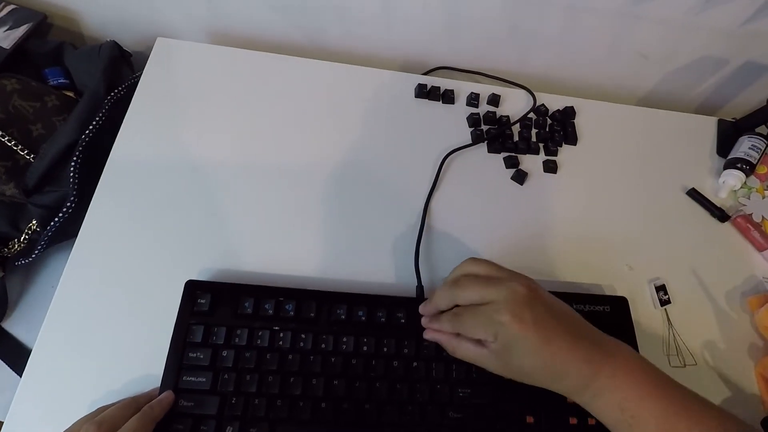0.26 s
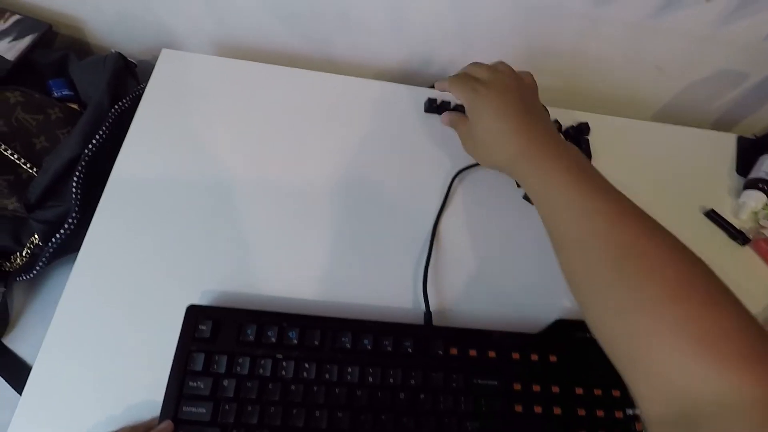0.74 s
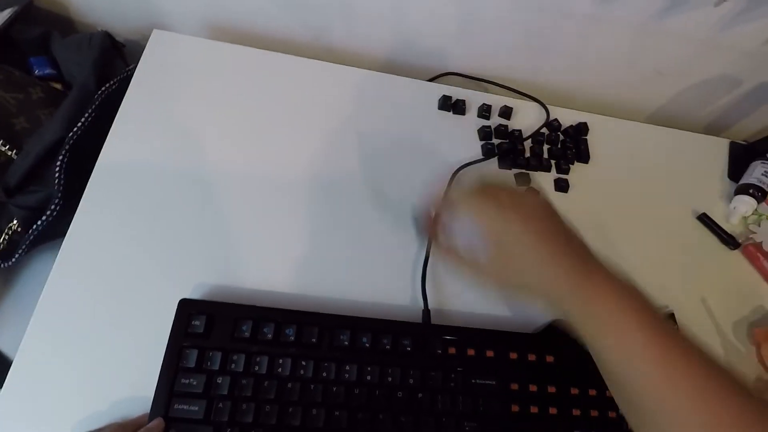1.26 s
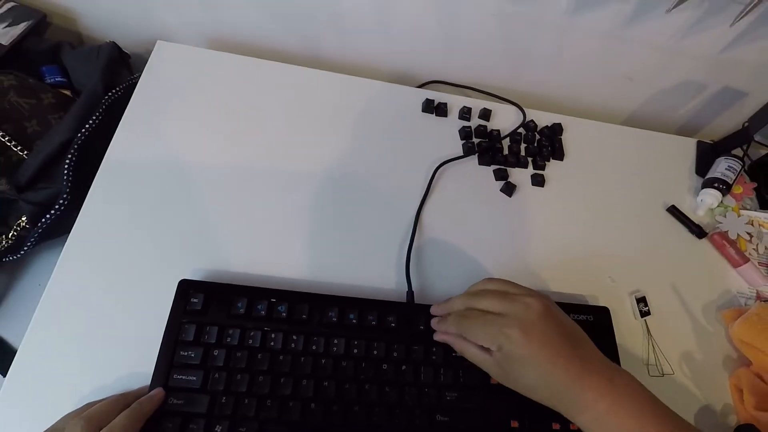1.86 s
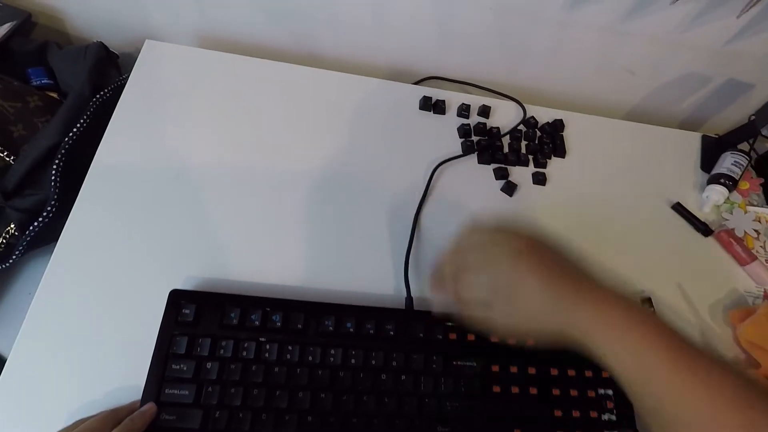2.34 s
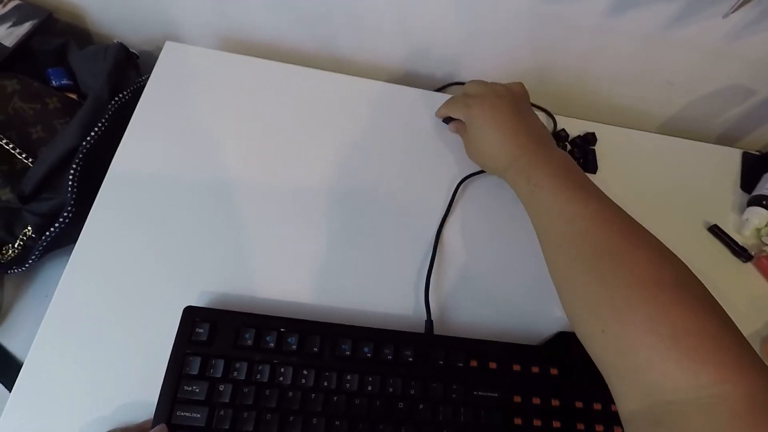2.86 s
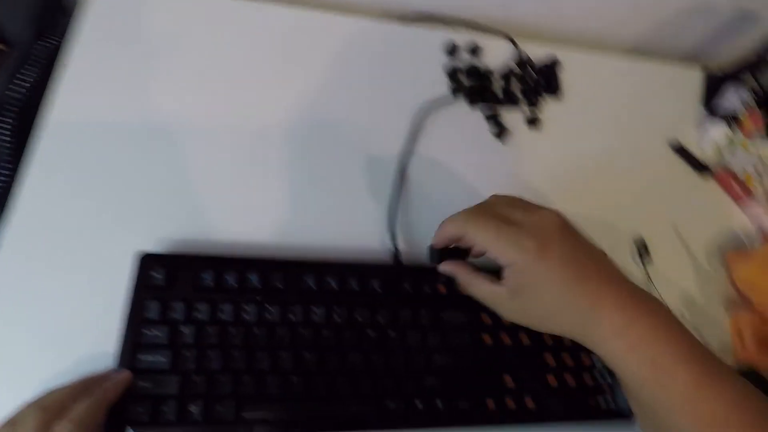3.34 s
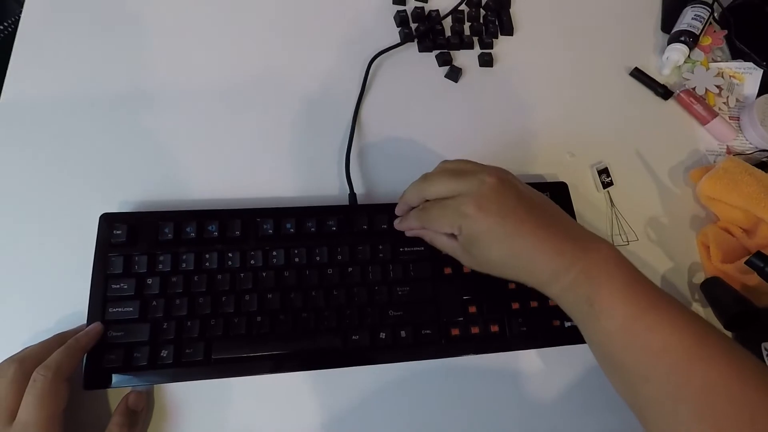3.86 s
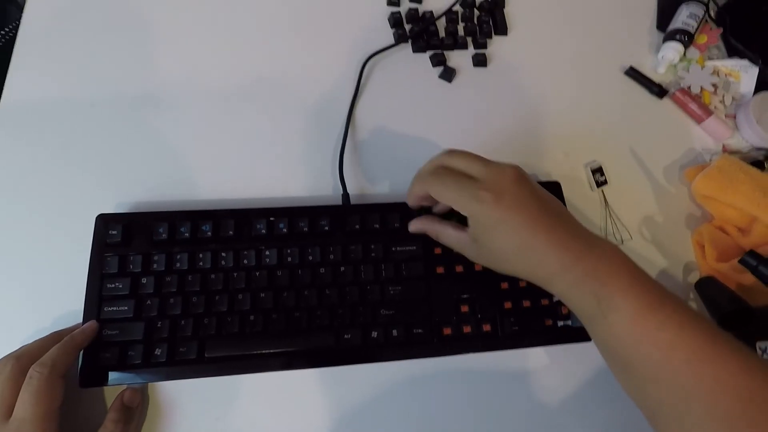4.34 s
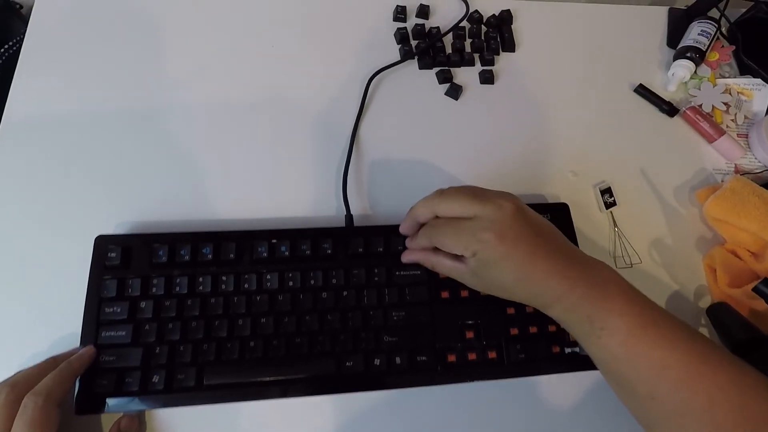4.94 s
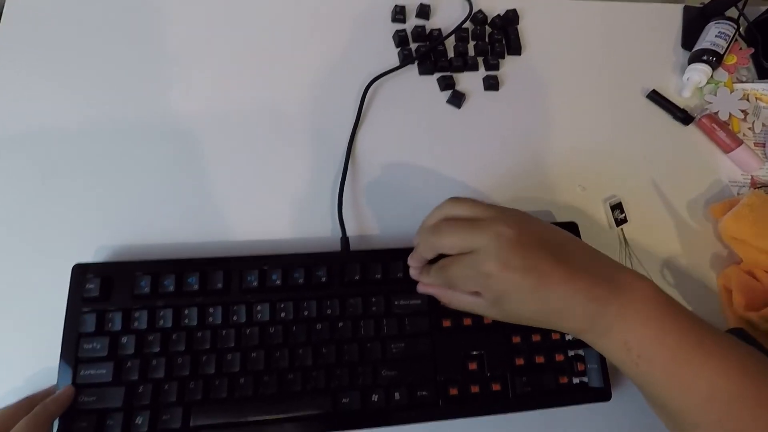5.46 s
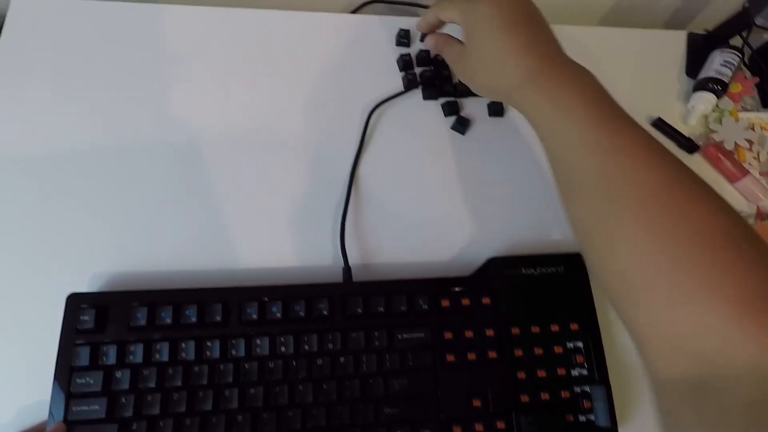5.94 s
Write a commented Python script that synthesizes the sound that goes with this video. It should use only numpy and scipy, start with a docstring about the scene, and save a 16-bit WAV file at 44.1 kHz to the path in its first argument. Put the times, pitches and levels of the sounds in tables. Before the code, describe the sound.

Irregular small plastic clacks, scrapes and ticks as keycaps snap onto a keyboard on a desk, with steady low hum and faint hiss in a small room.

```python
"""Plastic keycaps picked off a desk and pushed onto keyboard switches, in a small furnished room.
Throughout, two fan motors of nearly equal speed hum and beat over soft air noise and microphone hiss.
A flurry of contacts comes first, then sparser ones up to the hardest snap at 1.94 s; more handling leads
to a second hard snap at 3.84 s, then busy contacts until about 5.6 s and a last touch at 6.1 s.
Contacts are short chatters ringing cap, case and desk top; rubbing caps ring through stick-slip ticks."""
import sys
import numpy as np
from scipy import signal
from scipy.fft import rfft, irfft, next_fast_len
from scipy.io import wavfile
from scipy.ndimage import uniform_filter1d

SR = 44100
rng = np.random.default_rng(int(sys.argv[2]) if len(sys.argv) > 2 else 0)


def digitize_waveform(pressure):
    """Quantize a signal to 16-bit integers and store it at the path in sys.argv[1].

    Rows of a 2-D input are taken as channels; values are limited to [-1, 1].
    """
    field = np.atleast_2d(pressure).T
    bounded = np.clip(field, -1, 1)
    quanta = np.round(bounded * 32767).astype(np.int16)
    wavfile.write(sys.argv[1], SR, quanta)


N = 272979  # length in samples


def undb(db):
    """Decibels to gain."""
    return 10 ** (np.asarray(db) / 20)


def walk(rate_hz):
    """Slow random drift: a new level every 1 / rate_hz seconds, slewed twice; spread near 0.6."""
    hold = int(SR / rate_hz)
    steps = np.repeat(rng.standard_normal(N // hold + 1), hold)
    slewed = uniform_filter1d(uniform_filter1d(steps, hold), hold)
    return 0.8 * slewed[:N]


def shaped_noise(size, hz, db):
    """Noise whose spectrum follows the points on a log-frequency axis."""
    f = np.arange(1, size // 2 + 2) * SR / size
    gain = undb(np.interp(np.log(f), np.log(hz), db))
    return irfft(rfft(rng.standard_normal(size)) * gain, size)


# Spectrum of the air noise and hiss. Each row: frequency in Hz, relative density in dB.
AIR_SPECTRUM = [(18, -29), (34, -1.5), (60, -13), (110, -20), (200, -32), (330, -28), (540, -37),
                (990, -42), (1400, -47.5), (1750, -49.5), (1960, -44), (2200, -53), (6000, -57),
                (14500, -58.5), (16000, -73.5)]
AIR_DB = -47  # rms level around which the noise drifts


def air():
    """Steady air noise and microphone hiss behind everything, swelling a little."""
    noise = shaped_noise(next_fast_len(N), *np.transpose(AIR_SPECTRUM))[:N]
    return undb(AIR_DB + 1.2 * walk(0.9)) * noise / np.std(noise)


# Hum of the fans. Each row: multiple of the first motor, multiple of the second, middle peak level in dB.
HUM_LINES = [(1, 0, -33.5), (0, 1, -38.5), (2, 0, -60.5), (1, 1, -72), (2, 1, -61.5), (3, 1, -65.5)]
# Mains buzz. Each row: frequency in Hz, middle peak level in dB.
MAINS_LINES = [(120, -68.5), (180, -70), (240, -80), (300, -64.5), (360, -70.5), (420, -69.5)]
FIRST_MOTOR_HZ, SECOND_MOTOR_HZ = 57.94, 56.18
BEAT_TOP_S = 0.22  # all lines crest together here


def hum():
    """The motors beat against each other with harmonics and sum tones; the mains buzzes faintly."""
    t = np.arange(N) / SR - BEAT_TOP_S
    out = np.zeros(N)
    for first, second, db in HUM_LINES:
        hz = first * FIRST_MOTOR_HZ + second * SECOND_MOTOR_HZ
        out += undb(db + 0.35 * walk(18)) * np.cos(2 * np.pi * hz * t)
    for hz, db in MAINS_LINES:
        out += undb(db + 2.5 * walk(11)) * np.cos(2 * np.pi * hz * t)
    return out


# Slow part of the room's echo. Each row: frequency in Hz, level over the dry sound in dB, t60 in s.
ROOM_ECHO = [(152, -13.5, 0.63), (410, -9.5, .5), (978, -12.5, 0.34), (2600, -11.5, 0.38),
             (3700, -11.5, .42), (4940, -15, 0.46), (8760, -14.5, .4), (14700, -14.5, 0.21)]
EARLY_DB, EARLY_T60_S = 1.5, 0.022  # fast part: level over the slow part, decay time
SMEAR, SMEAR_HZ = 0.045, 122.4  # the echo blurs the spectrum by this share of the pitch, at least this much


def room(dry):
    """Diffuse echo: the energy of the near sound returns as noise that fades fast, then slowly."""
    frames = dict(nperseg=256, noverlap=192)
    f, t, spectrum = signal.stft(dry, SR, **frames)
    blur = np.exp(-.5 * ((f[:, None] - f) / np.maximum(SMEAR * f, SMEAR_HZ)) ** 2)
    power = (blur / np.sum(blur, axis=0)) @ np.abs(spectrum) ** 2

    hz, db_points, t60_points = np.transpose(ROOM_ECHO)
    db = np.interp(np.log(f + 1), np.log(hz), db_points)[:, None]
    t60 = np.interp(np.log(f + 1), np.log(hz), t60_points)[:, None]
    lag = t[None, :600] - .006  # the first walls answer after a few ms

    def fade(t60_s):
        """Exponential energy decay, about unit energy in all."""
        rate = np.log(1e6) / t60_s
        return (lag > 0) * np.exp(-rate * lag) * rate * t[1]

    response = undb(2 * db) * (fade(t60) + undb(2 * EARLY_DB) * fade(EARLY_T60_S))
    echo_power = np.abs(signal.fftconvolve(power, response, axes=1)[:, :len(t)])
    noise = signal.stft(rng.standard_normal(N), SR, **frames)[2]
    return signal.istft(np.sqrt(echo_power) * noise / np.std(noise), SR, **frames)[1][:N]


def ring(modes, length_s, detune=0.022, scatter_db=3.5):
    """Impulse response of each mode, one row a mode, scattered by chance; neighbours swing oppositely."""
    hz, db, t60 = np.transpose(modes)[:, :, None]
    level_chance, pitch_chance = rng.standard_normal((len(modes), 2)).T[:, :, None]
    t = np.arange(int(length_s * SR)) / SR
    decay = np.exp(-np.log(1000) * t / np.maximum(t60, .003))
    sense = (-1) ** np.arange(len(modes))[:, None]
    swing = np.sin(2 * np.pi * hz * (1 + detune * pitch_chance) * t)
    return sense * undb(db + scatter_db * level_chance) * decay * swing


def focus(modes, centre_hz, db_per_octave=7.5):
    """The place of contact favours the modes near centre_hz."""
    octaves = np.abs(np.log2(np.transpose(modes)[0][:, None] / centre_hz))
    return undb(-db_per_octave * octaves)


# Ringing modes of the plastic cap, its edge (the top treble) and the keyboard case.
# Each row: middle frequency in Hz, middle relative level in dB, t60 in s.
CAP_MODES = [(3396, 1, 0.0037), (3820, -6, .005), (4296, -5.5, .008), (5200, -5, 0.0072),
             (5970, -8.5, 0.0054), (5780, -8, 0.011), (6670, -6, 0.0042), (8060, -12.5, 0.018),
             (7150, -8.5, 0.0067), (8680, -6, 0.012), (8900, -10, .006)]
EDGE_MODES = [(9780, 0, 0.0073), (11300, -5.5, .005), (11880, -4, 0.0075), (12800, -6.5, .005),
              (14500, -4, 0.0046), (14950, -4.5, 0.0034)]
CASE_MODES = [(708, -4, 0.04), (823, -4, 0.027), (989.5, -4, 0.051), (1094, -4, 0.026), (1289, 2, 0.021),
              (1530, -2, 0.018), (1638, 0.5, 0.016), (1973, 0, .02), (2267, -7.5, 0.033),
              (2534, -4.5, 0.021), (2960, -2.5, 0.018), (2883, -12, .008), (3552, -2, .007),
              (4150, -3.5, 0.005)]
# Caps sliding and fingers rubbing; the level glides evenly in dB.
# Each row: start in seconds, length in seconds, cap rms at start in dB, cap rms at end in dB,
# cap edge over cap in dB, case over cap in dB, cap brightest spot in Hz, case brightest spot in Hz.
RUBS = [(0.0, 0.014, -55, -62.5, -8, 8, 6600, 1170), (0.026, 0.03, -60.5, -66, -0.5, 9, 5060, 890),
        (0.116, .03, -69, -73, 7, 18, 6200, 1030), (0.152, 0.027, -66, -47, -4, 9, 5400, 1080),
        (0.288, 0.021, -75, -51, -14, 12.5, 6000, 1230), (0.313, 0.025, -60, -53, -3, 1, 6000, 1240),
        (.863, .016, -36, -37, -24, -3, 4350, 1220), (0.888, .02, -59, -69, -8, -4, 3920, 930),
        (0.907, 0.059, -52.5, -43.5, -20, -0.5, 3720, 1680),
        (0.963, 0.032, -32.5, -91, -24, -5, 3670, 1940), (1.623, 0.026, -76, -77, -8, 7, 6100, 1100),
        (1.658, 0.033, -62.5, -66, -6, 10, 6200, 1200), (1.78, 0.035, -76, -85, -3, 16, 5900, 1100),
        (1.832, .03, -70, -88, -6, 18.5, 6300, 1150), (1.9, .015, -72, -82, -7, 17, 5200, 1898),
        (2.148, 0.011, -57, -59, 1, 7.5, 6950, 1100), (2.162, .028, -46.5, -60.5, -7, 4.5, 6850, 1100),
        (2.676, 0.047, -49.5, -41, -16, 2, 4270, 1220), (2.725, .024, -35, -59, -14, 5.5, 4280, 1430),
        (2.749, 0.041, -60, -58, -5, 3, 4200, 1450), (2.79, 0.058, -55, -52, -12, 3, 4200, 1860),
        (2.848, 0.027, -62.5, -71, -2, -8, 4400, 1720), (3.362, 0.059, -57, -70, -15, 2, 4650, 840),
        (3.451, 0.046, -76, -79, -7, 17.5, 5900, 1420), (3.54, .024, -48, -71, -3, 6, 6600, 1280),
        (3.631, .13, -74, -82, -10, 14, 4170, 990), (4.06, 0.018, -67, -71.5, -7.5, 10, 5100, 945),
        (4.099, 0.063, -70, -60, -7, 5, 6100, 1550), (4.161, 0.027, -39, -81, -10, 11, 7300, 1110),
        (4.334, .007, -66.5, -49, -15, 11, 5040, 1120), (4.348, 0.023, -53, -63, -8, 5, 4000, 1320),
        (4.413, 0.08, -70, -90, -17, 13, 4050, 1030), (4.527, 0.069, -69.5, -77.5, 0, 12, 4050, 1020),
        (4.767, 0.031, -59, -46, -9, 11, 5920, 1290), (4.803, 0.0091, -40, -43, -17, -7, 5930, 1880),
        (4.828, 0.011, -36.5, -68, -9, 13.5, 3700, 820), (4.846, 0.025, -67, -59, 0, 8, 4000, 860),
        (5.009, 0.15, -73.5, -73.5, -6, 19.5, 5450, 1050), (5.258, 0.016, -55.5, -51, -6, 14, 6120, 1540),
        (5.276, 0.033, -53, -74, -4, 17, 5720, 990), (5.363, .04, -74, -68, -3, 8, 5430, 965),
        (5.462, 0.07, -70, -65, -12, 12, 5100, 950), (5.533, 0.024, -64.5, -43.5, -9, 5.5, 4500, 920),
        (5.581, .02, -54, -70, -15, 6, 5450, 850), (5.605, 0.18, -73.5, -80, -7.5, 11.5, 4910, 1265),
        (6.084, 0.033, -61.5, -45, -23.5, 2.5, 4050, 1400),
        (6.121, 0.045, -47.5, -64, -7.5, 4.5, 4600, 900)]


def slides():
    """Uneven stick-slip ticks ring cap and case while something rubs, swelling or dying away."""
    out = np.zeros(N)
    grip = undb(3.17 * walk(400) + 2.8 * walk(80))
    grip_rms = np.sqrt(np.mean(grip ** 2))
    for start_s, length_s, from_db, to_db, edge_db, case_db, cap_hz, case_hz in RUBS:
        first = int(start_s * SR)
        span = np.arange(first, min(int((start_s + length_s) * SR), N))
        level_db = np.linspace(from_db, to_db, len(span))
        parts = ((CAP_MODES, 0, focus(CAP_MODES, cap_hz, 31.0)),
                 (EDGE_MODES, edge_db, 1),
                 (CASE_MODES, case_db, focus(CASE_MODES, case_hz, 9.6)))
        for modes, over_cap_db, weight in parts:
            body = ring(modes, .05) * weight
            force = grip[span] * undb(level_db + over_cap_db) / np.linalg.norm(body)
            ticks = rng.standard_normal((len(modes), len(span))) * force
            rub = np.sum(signal.fftconvolve(ticks, body, axes=1), axis=0)[:N - first]
            out[first:first + len(rub)] += rub / grip_rms
    return out


def strike(force, body):
    """The force rings every mode; each mode takes its own share of the energy whatever the chatter."""
    rows = signal.fftconvolve(force[None], body, axes=1)
    share = np.linalg.norm(body, axis=1) / np.linalg.norm(rows, axis=1)
    return np.sum(rows * share[:, None], axis=0)


def add(out, start_s, sound, peak_db):
    """Mix a sound in; its loudest 1.5 ms match a sine of the given peak level."""
    first = int(start_s * SR)
    sound = sound[:N - first]
    loudest = np.sqrt(2 * np.max(uniform_filter1d(sound ** 2, size=66)))
    out[first:first + len(sound)] += sound * undb(peak_db) / loudest


# Ringing modes of the desk top. Each row: middle frequency in Hz, middle relative level in dB, t60 in s.
DESK_MODES = [(42, -4, .25), (86, -5, 0.18), (125.6, 2.5, 0.17), (170.9, -2.5, 0.13), (222, -7, 0.18),
              (301.8, 0.5, 0.32), (349.6, -2, 0.4), (387.5, -2.5, 0.23)]
# Contacts of cap, keyboard and desk. Each row: start in seconds, cap level in dB, cap edge level in dB,
# case level in dB, desk level in dB, cap brightest spot in Hz, case brightest spot in Hz, chatter in ms.
HANDLING = [(0.0203, -46, -56, -39.5, -39.5, 4670, 660, 4.4),
            (.0515, -67, -56, -42.5, -45, 3380, 1040, 1.9), (0.095, -58, -65, -49, -58, 3490, 780, 2.7),
            (.124, -48.5, -58, -53, -39, 7530, 942, 2.4), (.138, -50, -51, -36, -49.5, 6820, 980, 1.4),
            (0.148, -65, -70, -46, -53, 6000, 1110, 1.1), (0.164, -34.5, -40, -35.5, -49, 5840, 1140, 1.5),
            (0.1755, -40, -43, -51, -42, 3270, 1030, 0.52), (0.1914, -29.5, -27, -29.5, -48, 3330, 1090, 2),
            (0.304, -44, -56, -42, -55, 6390, 1320, 2.2),
            (0.3322, -28.5, -42.5, -27.5, -39.5, 5370, 1090, 4.5),
            (.862, -35, -61, -37, -54, 4260, 1510, 9.9), (0.875, -39, -63, -32.5, -34.5, 4430, 980, 2.8),
            (0.9571, -37.5, -63, -40, -62, 3240, 1900, 4.1), (1.259, -58, -78, -63, -45, 5570, 608, 2.5),
            (1.5783, -55, -73, -61, -67, 7180, 697, 2), (1.5926, -52, -59, -53, -44, 7630, 988, 2.7),
            (1.6145, -54, -62, -37, -51, 3520, 960, 3.1), (1.661, -49, -56, -59, -49, 3220, 1310, 6.8),
            (1.709, -57, -66, -35, -67, 3570, 1400, 2.6), (1.7351, -51, -59, -31.5, -37, 5920, 1730, 1.8),
            (1.7675, -44.5, -55, -34.5, -40.5, 8030, 1220, 2.5),
            (1.8334, -58, -73, -48, -64, 6820, 1320, 2), (1.867, -41, -50, -33, -48, 6090, 1600, 2.2),
            (1.9402, -4.5, -7, -9, -15.5, 7530, 824, 2.1), (1.9515, -29, -35, -26, -25, 7940, 990, 2.7),
            (2.045, -52, -43, -34.5, -45, 9380, 1160, 1.4),
            (2.159, -35.5, -39, -45.5, -49, 7140, 1330, 2.7), (2.2002, -42, -49, -36, -51, 3200, 1270, 2.2),
            (2.2234, -29.5, -43, -22.5, -36, 5930, 732, 4.2), (2.6796, -53, -59, -35.5, -53, 4140, 1092, 2),
            (2.6972, -42.5, -48, -36.5, -55, 4590, 964, 4.6),
            (2.728, -31.5, -47, -26.5, -36, 4290, 1620, 6.8), (2.776, -54, -67, -44, -52, 3780, 1910, 1.8),
            (2.7814, -39, -64, -33.5, -52, 3470, 2720, 1.5),
            (2.8417, -46, -68, -35.5, -57, 4520, 1890, 3.1),
            (3.1617, -58.5, -65, -62.5, -58.5, 8000, 1893, 1.9),
            (3.3572, -46, -58, -48.5, -54, 4950, 1210, 8.6),
            (3.4323, -30.5, -37, -36, -64, 8580, 2380, 5.9),
            (3.4997, -57, -63, -38.5, -45, 3290, 1260, 1.6), (3.531, -40, -52, -46, -55, 7070, 2030, 3.6),
            (3.5788, -31.5, -42, -28.5, -31.5, 5620, 1170, 4.6),
            (3.6177, -37.5, -48, -30, -32, 3250, 825, 4.3), (3.6724, -52, -72, -55, -57.5, 7050, 834, 2.2),
            (3.685, -53.5, -71, -56, -62, 7650, 1050, 1.4), (3.698, -54, -72, -63, -62, 8000, 1040, 1.53),
            (3.7718, -48.5, -56.5, -37, -56, 6020, 1690, 3.3), (3.812, -54, -60, -45.5, -48, 3260, 980, .8),
            (3.8324, -31, -46, -30.5, -28.5, 8000, 1320, 3.6), (3.8411, -10, -19, -10, -15, 8010, 1340, 3),
            (3.8449, -14.5, -20.5, -17, -19, 5490, 1640, 3),
            (3.9514, -45, -40.5, -34.5, -31.5, 3600, 990, 1.8),
            (4.0505, -57, -72, -38.5, -48, 4020, 982, 1.3), (4.1198, -58, -62, -39, -62.5, 3270, 2130, 1.8),
            (4.1568, -39.5, -39.5, -23.5, -37, 3300, 1040, 2.2),
            (4.1947, -55, -66, -42, -64, 3210, 872, 4.2), (4.342, -32, -54, -31.5, -61, 3220, 1044, 1),
            (4.3784, -37, -52, -28, -59, 5820, 1075, 1.5), (4.397, -47, -72, -36.5, -56, 3460, 1020, 2.5),
            (4.4438, -64.5, -71, -46, -53.5, 3540, 1020, 3.2),
            (4.524, -37.5, -60, -31.5, -51.5, 3390, 1036, 3.1),
            (4.563, -61.5, -70, -37, -45, 3620, 1007, 2.6), (4.7709, -58, -59, -37.5, -55, 3450, 1310, 2),
            (4.8015, -28.5, -50, -36.5, -51, 5760, 1530, 1.7), (4.813, -30, -40, -20, -38, 3630, 2080, 3.4),
            (4.8242, -29.5, -48, -34, -49, 3210, 977, 2.6), (4.8609, -32.5, -50, -52, -42, 3410, 977, 2.6),
            (4.8785, -23, -31, -26, -28, 8800, 1010, 3.15), (5.1113, -46, -59, -38.5, -53, 3990, 1320, 5.2),
            (5.128, -51, -62, -54, -58, 6500, 2900, 1.5), (5.1398, -20, -26.5, -16, -26, 8870, 1760, 6.2),
            (5.2699, -27.5, -36, -28.5, -21, 6480, 743, 6.3), (5.2894, -43, -57, -31, -39, 3940, 1350, 1.9),
            (5.3187, -58, -52, -37.5, -32, 8120, 1216, 1.4), (5.3392, -46, -50, -37, -45, 3440, 2060, 3.7),
            (5.3465, -35.5, -36, -25.5, -39, 8020, 970, 4.5), (5.373, -51, -51, -37.5, -32, 6460, 870, 1.7),
            (5.394, -48, -65, -50, -53.5, 3670, 751, 1.5), (5.5607, -36, -47, -33, -32, 4040, 1283, 4.4),
            (5.5747, -29.5, -39.5, -26.5, -43, 5800, 740, 3.8),
            (6.1003, -45.5, -60, -47.5, -50.5, 4280, 2065, 3.2)]
# A contact reaches full force after this time plus this share of its chatter.
BUILD_UP_S, BUILD_UP_SHARE = .0007, 0.12


def contacts():
    """Each contact chatters for a few ms on cap and case; the desk takes only the slow push."""
    out = np.zeros(N)
    t = np.arange(int(.04 * SR)) / SR
    push = t * np.exp(-t / 0.00063)
    for start_s, cap_db, edge_db, case_db, desk_db, cap_hz, case_hz, chatter_ms in HANDLING:
        span = np.clip(chatter_ms, .2, 15) / 1000
        rise = BUILD_UP_S + BUILD_UP_SHARE * span
        noise = rng.standard_normal(len(t))
        ticks = noise * np.abs(noise) ** 0.22  # spiky: tiny rebounds
        fall = np.exp(-(np.maximum(t - rise, 0) / span) ** 2)
        chatter = ticks * np.minimum(t / rise, 1) ** 2 * fall

        # a hard snap rings the cap's bright spot more clearly
        sharp_db = 9.0 + .5 * max(cap_db + 21, 0)
        cap = ring(CAP_MODES, .02) * focus(CAP_MODES, cap_hz, sharp_db)
        case = ring(CASE_MODES, 0.07) * focus(CASE_MODES, case_hz)
        desk = np.sum(ring(DESK_MODES, .3), axis=0)
        add(out, start_s, strike(chatter, cap), cap_db)
        add(out, start_s, strike(chatter, ring(EDGE_MODES, .02)), edge_db)
        add(out, start_s, strike(chatter, case), case_db)
        add(out, start_s, signal.fftconvolve(push, desk), desk_db)
    return out


def scene():
    """Hands at the keyboard in the room, over hum and air."""
    near = slides() + contacts()
    return (air() + hum() + room(near) + near)[None]


def record(dry):
    """The microphone path rounds the loudest peaks and cuts the top."""
    ceiling, top_hz = .76, 15600
    rounded = dry / (1 + np.abs(dry / ceiling) ** 4) ** .25
    low_pass = signal.ellip(10, .2, 90, top_hz, fs=SR, output="sos")
    return signal.sosfilt(low_pass, rounded)


dry = scene()
out = record(dry)
digitize_waveform(out)
```